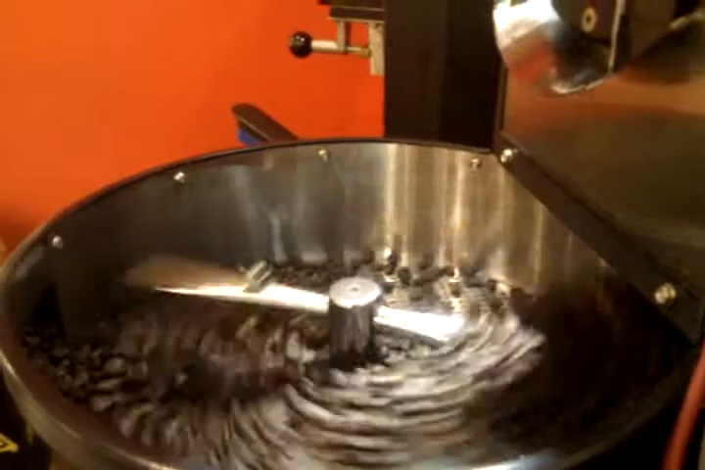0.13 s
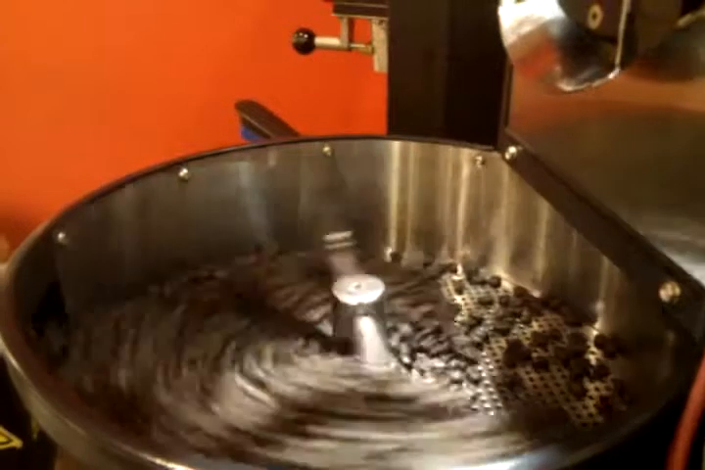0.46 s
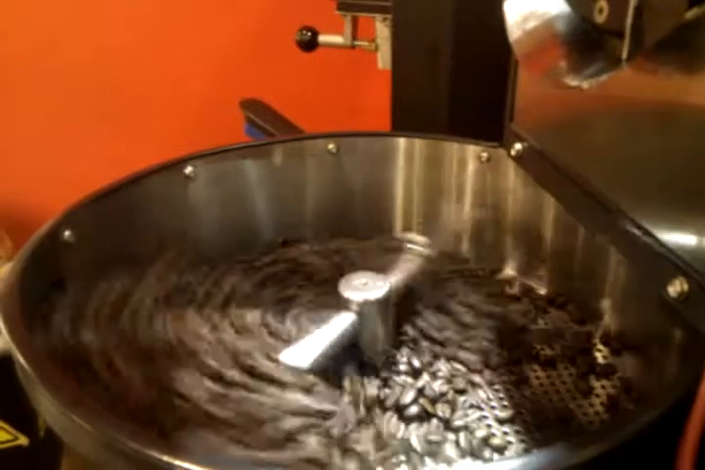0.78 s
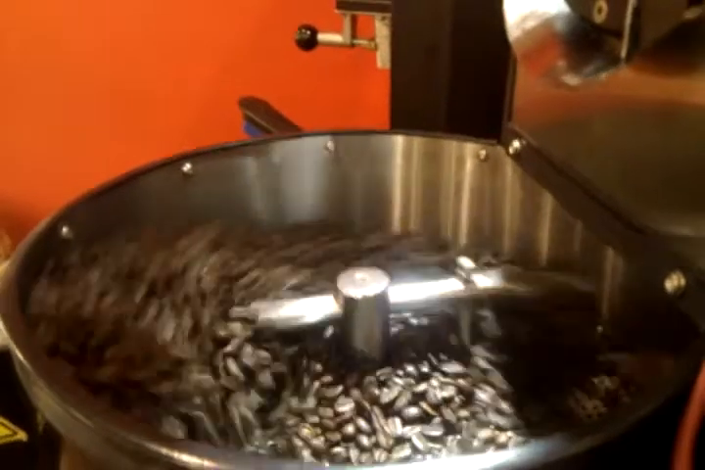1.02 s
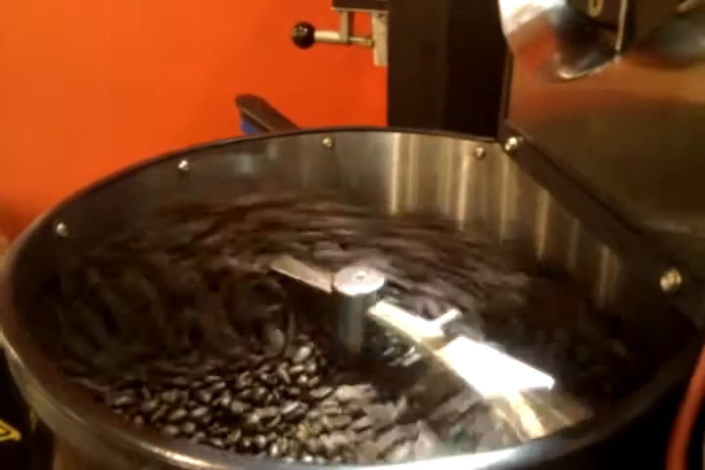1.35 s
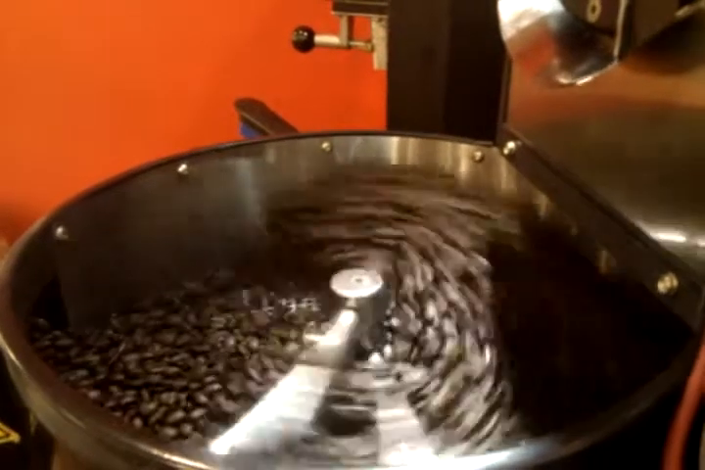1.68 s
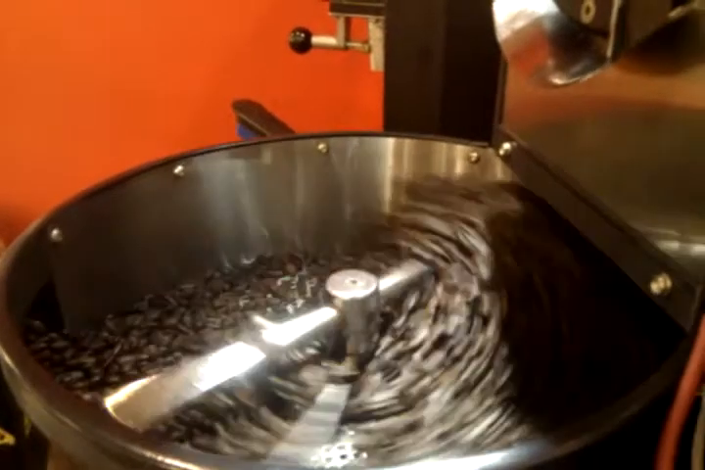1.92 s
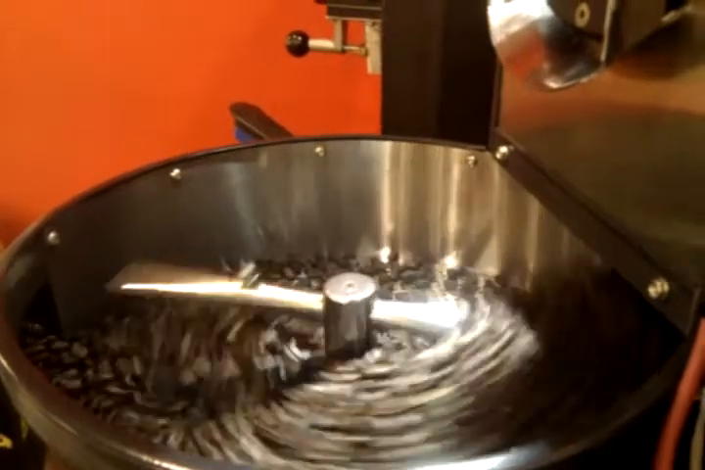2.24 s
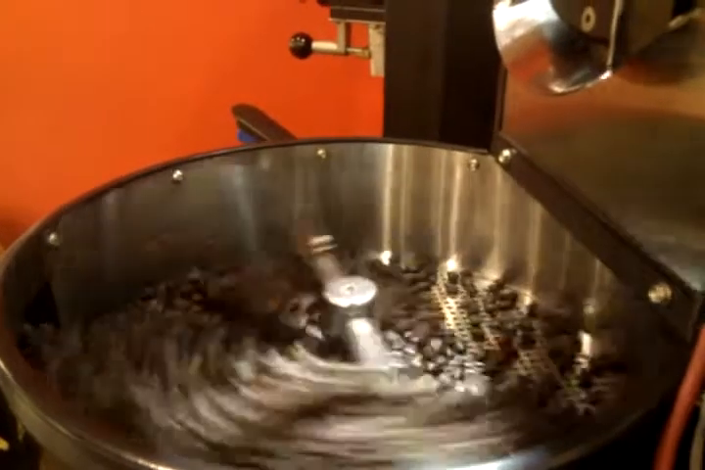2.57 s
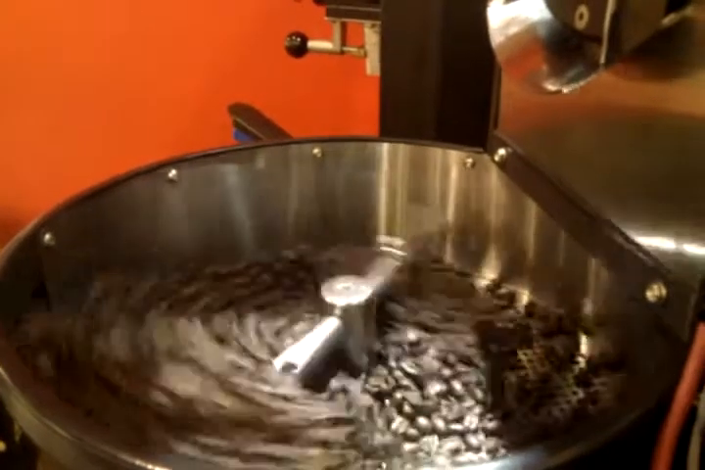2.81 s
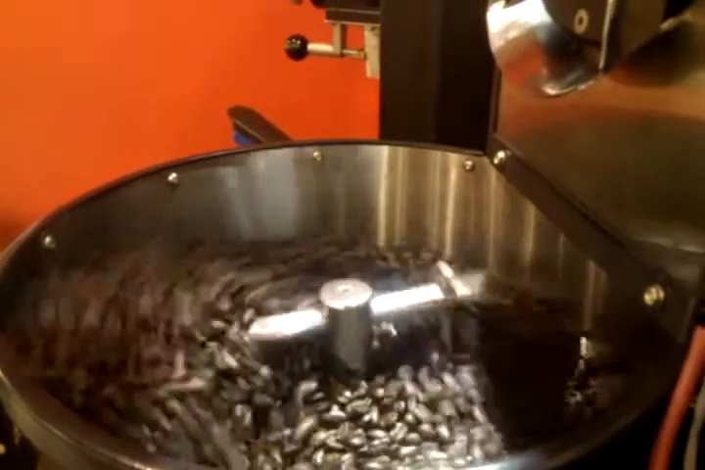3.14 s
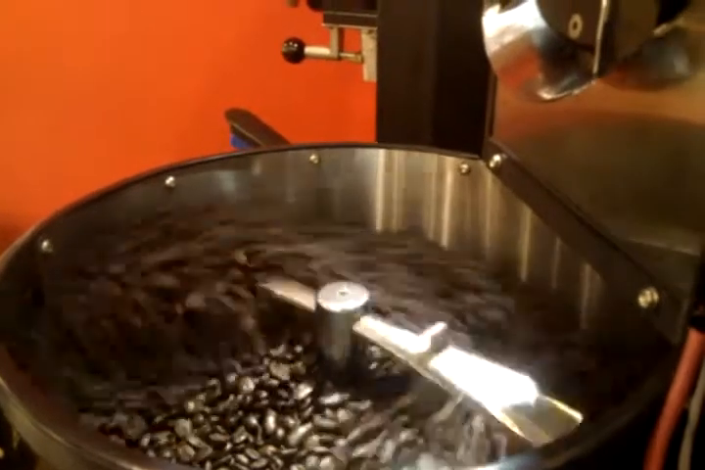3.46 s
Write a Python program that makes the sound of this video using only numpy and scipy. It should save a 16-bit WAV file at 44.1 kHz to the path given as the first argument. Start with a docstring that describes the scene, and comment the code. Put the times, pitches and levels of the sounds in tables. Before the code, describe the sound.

Coffee beans rattle and swish as steel arms stir them, over a rushing fan.

```python
"""Steel arms stir roasted coffee beans round the cooling tray of a roaster, close by.
From the start the beans tick on each other and slide in a swish, while the cooling fan rushes and
whines, its motor hums and the housing rumbles. Soon clumps clack on the perforated steel and the arms
shove the heap into crunches. At 0.28 s all but the clacks duck and swell back, the first of six dips.
The hardest clack comes at 2.35 s; near 2.6 s the fan, hum and rumble swell to their loudest."""
import sys
import numpy as np
from scipy.fft import rfft, irfft, next_fast_len
from scipy.io import wavfile
from scipy.ndimage import map_coordinates

SR = 44100
rng = np.random.default_rng(int(sys.argv[2]) if len(sys.argv) > 2 else 0)


def wav_record(signal):
    """Record a signal, one row per channel, as 16-bit PCM in the file named by sys.argv[1]."""
    frames = np.transpose(np.atleast_2d(signal))
    bounded = np.clip(frames, -1, 1)
    # unit amplitude maps onto the largest positive 16-bit level
    quanta = np.round(bounded * 32767).astype(np.int16)
    wavfile.write(sys.argv[1], SR, quanta)


N = 157878

# spectrum of bean impacts: frequency_hz, gain_db
IMPACT_SPECTRUM = [(1500, -48), (3500, -32.5), (4700, -19), (5350, -9), (5650, -11), (5950, -6),
                   (6300, -5.5), (6950, 1.5), (7300, -4), (8000, -2.5)]


def amp(db):
    """The decibel scale: 20 dB is a factor of ten in amplitude."""
    return 10 ** (np.asarray(db) / 20)


def unit(x):
    """Normalisation to an rms of 1."""
    return x / np.sqrt(np.mean(x ** 2) + 1e-20)


def curve(rows):
    """Linear interpolation of (time_s, value) rows, one value a sample."""
    return np.interp(np.arange(N) / SR, *np.transpose(rows))


def wobble(knots_per_s):
    """Smooth random modulation: a spline through Gaussian knots."""
    knots = rng.standard_normal(int(N * knots_per_s / SR) + 4)
    return map_coordinates(knots, [np.arange(N) * knots_per_s / SR])


def coloured(x, spectrum):
    """Minimum-phase filtering by (frequency_hz, gain_db) rows."""
    size = 2 * next_fast_len(N // 2 + 8192)
    hz, db = np.transpose(spectrum)
    gain = amp(np.interp(np.log(np.fft.rfftfreq(size, 1 / SR) + 1), np.log(hz + 1), db))
    cepstrum = irfft(np.log(gain))
    cepstrum[1:size // 2] *= 2  # folding the cepstrum makes the filter causal
    cepstrum[size // 2 + 1:] = 0
    return irfft(rfft(x, size) * np.exp(rfft(cepstrum)))[:N]


def contacts(per_s, scatter_db):
    """A random point process: times and amplitudes of independent bean contacts."""
    count = int(per_s * N / SR)
    return rng.random(count) * N / SR, amp(scatter_db * np.minimum(rng.standard_normal(count), 2))


def overlap(start_s, rings):
    """Superposition: each ring adds in from its own start time."""
    at = (start_s * SR).astype(int)[:, None] + np.arange(rings.shape[1])
    return np.bincount(at.ravel(), rings.ravel(), N)[:N]


def grains(start_s, sizes, lo_hz, hi_hz, t60_s):
    """Damped free vibration: each contact rings briefly at a random pitch."""
    t = np.arange(256) / SR
    place, phase = rng.random((len(start_s), 2)).T
    pitch_hz = lo_hz + (hi_hz - lo_hz) * place
    rings = np.sin(2 * np.pi * (pitch_hz[:, None] * t + phase[:, None]))
    rings *= sizes[:, None] * np.exp(-np.log(1000) * t / t60_s)
    return overlap(start_s, rings)


def bean_rattle():
    """Granular impact noise: beans tick on each other in small avalanches."""
    # clatter of tumbling beans: time_s, relative_level_db
    levels = [(0.0, -13), (0.08, -19), (0.24, -12.5), (0.4, -16.5), (0.88, -12), (0.95, -13), (1.03, -11.5),
              (1.35, -13), (1.51, -16.5), (2.07, -11.5), (2.23, -18.8), (2.31, -17.0), (2.63, -14.5),
              (2.7, -14), (2.86, -15.5), (2.94, -12.5), (3.42, -13.5), (3.58, -12)]
    ticks = grains(*contacts(per_s=3600, scatter_db=0), lo_hz=4100, hi_hz=8495, t60_s=0.0036)
    avalanches = amp(0.93 * wobble(50) + 0.85 * wobble(240))
    return amp(curve(levels) - 2.0) * unit(coloured(ticks * avalanches, IMPACT_SPECTRUM))


def bean_swish():
    """Sliding friction: dense, duller contacts merge into a swish, and each shove adds its power."""
    # beans sliding ahead of the arms: time_s, relative_level_db
    levels = [(0.0, -25.5), (0.08, -27), (0.16, -25.5), (0.56, -27.5), (0.64, -25), (1.35, -24),
              (1.59, -26), (1.67, -27), (1.83, -26.0), (1.99, -26.5), (2.31, -28.5), (2.47, -25.5),
              (2.63, -27.0), (2.7, -23.5), (2.86, -27), (3.02, -25), (3.18, -24.5), (3.58, -23)]
    # spectrum of the friction: frequency_hz, gain_db
    spectrum = [(500, -32.5), (1500, -17), (2300, -7), (2750, -8), (3200, -5), (3900, -2.5), (5200, 1),
                (6500, 3.5), (8000, -2)]
    friction = grains(*contacts(per_s=9000, scatter_db=1.5), lo_hz=1000, hi_hz=7920, t60_s=0.0035)
    sliding = amp(curve(levels) + 3.0 + .6 * wobble(40))
    return np.hypot(sliding, arm_shoves()) * unit(coloured(friction, spectrum))


def arm_shoves(attack_s=0.005, release_s=0.0044):
    """Envelope of forced sliding: the crunch rises fast, holds while an arm pushes and dies away."""
    # pushes on the heap: start_s, length_s, level_db
    shoves = [(0.14, .016, -21), (0.442, .025, -30.5), (0.745, 0.03, -20.5), (0.858, .018, -22),
              (1.522, 0.016, -24), (1.631, .08, -22.5), (1.737, 0.025, -20), (1.982, 0.015, -24.5),
              (2.347, .015, -22.5), (2.682, .022, -24), (3.002, 0.02, -22), (3.469, 0.021, -21.5)]
    t = np.arange(N) / SR
    envelope = np.zeros(N)
    for start_s, length_s, level_db in shoves:
        rise = np.clip((t - start_s) / attack_s, 0, 1)
        release = np.exp(-np.maximum(t - start_s - length_s, 0) / release_s)
        envelope += amp(level_db) * rise * release
    return envelope


def steel_clacks(ring_hz=6930, rise_s=.0014, followers=8):
    """Impact excites resonance: one bean sets the steel ringing, and the rest of its clump follows."""
    # clumps striking the steel: start_s, relative_level_db, spread_s
    clumps = [(.0727, -8.5, .008), (0.106, -12.5, 0.0051), (0.154, -12.5, 0.0054), (0.185, -9.5, .016),
              (.236, -12.5, .018), (.346, -16, 0.011), (0.447, -13.5, .01), (0.502, -13, .012),
              (0.745, -8, .012), (0.816, -7.5, .006), (0.956, -10, .005), (1.0061, -10, .005),
              (1.0375, -9.5, .008), (1.08, -7, .006), (1.098, -8.5, .004), (1.5224, -10, .014),
              (1.75, -6.5, .008), (1.985, -9, 0.015), (2.347, -4, .012), (2.43, -11.5, .006),
              (2.656, -9.5, .004), (2.696, -9, .005), (2.77, -10.5, .006), (2.9392, -10.5, .012),
              (2.9692, -11, .008), (3.0131, -9, 0.0036), (3.498, -7.5, .012)]
    start_s, level_db, spread_s = np.transpose(clumps)
    t = np.arange(SR // 50) / SR
    envelope = (t / rise_s) ** 2 * np.exp(2 * (1 - t / rise_s))
    chance = rng.random((len(clumps), followers + 1))
    pitch_hz = ring_hz * (1 + 0.041 * (chance[:, :1] - .5))
    rings = amp(level_db[:, None] - 2) * envelope * np.sin(2 * np.pi * pitch_hz * t)
    follow_s = start_s[:, None] + spread_s[:, None] * chance[:, 1:]
    sizes = np.repeat(amp(level_db - 4.5), followers)
    tails = grains(follow_s.ravel(), sizes, lo_hz=5800, hi_hz=7200, t60_s=0.0062)
    return overlap(start_s, rings) + coloured(tails, IMPACT_SPECTRUM)


def tones(base_hz, lines, drift_hz, flutter_db):
    """A line spectrum: (order, level_db) multiples of one drifting frequency, each fluttering."""
    cycles = np.cumsum(base_hz + drift_hz * wobble(2.96)) / SR
    total = np.zeros(N)
    for order, level_db in lines:
        gain = amp(level_db + flutter_db * wobble(9))
        total += gain * np.sin(2 * np.pi * (order * cycles + rng.random()))
    return np.sqrt(2) * total


def cooling_fan(shaft_hz=49.765, faint_db=-57):
    """Aerodynamic noise: air rushes through the tray and the rotor whines at orders of its shaft rate."""
    # rush of the air: time_s, relative_level_db
    levels = [(0.0, -31), (0.32, -29), (0.56, -31), (1.11, -31.5), (1.35, -34.5), (1.43, -33.5),
              (1.67, -30.5), (2.15, -31), (2.23, -32), (2.63, -29.0), (2.86, -32), (3.58, -32)]
    # spectrum of the rush: frequency_hz, gain_db
    spectrum = [(20, -16.5), (48, -10), (100, -7.5), (160, -2), (230, -1.5), (330, -1.5), (385, 3),
                (440, -5), (720, -3.5), (1150, -7), (1550, -10.5), (2400, -6.5), (4000, -21)]
    # strong lines of the whine: shaft_order, level_db
    strong_lines = [(3, -50), (8, -43.5), (11, -48), (14.5, -48.5), (16, -52.5), (17, -51), (20, -49),
                    (22, -49.5), (23, -48.5), (24, -44), (26, -51.5)]
    air = unit(coloured(rng.standard_normal(N), spectrum)) * amp(-1.5 + 0.45 * wobble(12))
    strong_orders = [order for order, _ in strong_lines]
    faint_lines = [(order, faint_db) for order in range(10, 30) if order not in strong_orders]
    whine = tones(shaft_hz, strong_lines + faint_lines, drift_hz=.03, flutter_db=1.34)
    flow_db = curve(levels)
    return amp(flow_db) * air + amp(flow_db - flow_db.mean()) * whine


def motor_hum(mains_hz=50.02, flutter_db=.8):
    """Forced vibration at harmonics of the mains; the strongest, the fourth, swells and fades."""
    # fourth harmonic: time_s, level_db
    levels = [(0, -36), (.2, -33.5), (.4, -32), (.72, -35), (1.03, -34), (1.2, -41), (1.36, -41),
              (1.62, -39.5), (1.88, -36.5), (2.15, -36.5), (2.48, -34.5), (2.63, -29.5), (2.8, -35.5),
              (3.12, -35.5), (3.38, -42), (3.58, -34.5)]
    # weaker harmonics: mains_order, level_db
    weak_lines = [(2, -48), (5, -51.5), (6, -43), (14, -47)]
    fourth = amp(curve(levels)) * tones(mains_hz, [(4, 0)], drift_hz=0.049, flutter_db=flutter_db)
    return fourth + tones(mains_hz, weak_lines, drift_hz=.02, flutter_db=flutter_db)


def housing_rumble():
    """Structure-borne sound: the shaking housing radiates low noise, now more, now less."""
    # strength of the shaking: time_s, level_db
    levels = [(0, -43), (.56, -39), (.75, -39.5), (1.0, -43), (1.5, -43.5), (1.8, -43), (2.15, -44),
              (2.6, -37.5), (2.9, -41), (3.58, -44)]
    # spectrum of the housing: frequency_hz, gain_db
    spectrum = [(15, -17.5), (35, -16), (50, -4), (68, -2.5), (86, -8.5), (108, -3), (135, 3), (175, -3),
                (260, -17.5), (600, -45)]
    return amp(curve(levels)) * unit(coloured(rng.standard_normal(N), spectrum))


def level_dips(drop_s=.003):
    """Amplitude modulation: a gain that drops within milliseconds and creeps back."""
    # brief dips in level: start_s, depth_db, recovery_s
    dips = [(0.276, 8.5, 0.31), (1.262, 2.5, 0.36), (1.539, 3, 0.23), (2.043, 5.5, 0.3), (2.702, 5.5, 0.18),
            (3.524, 4.5, 0.33)]
    t = np.arange(N) / SR
    loss_db = np.zeros(N)
    for start_s, depth_db, recovery_s in dips:
        onset = np.clip((t - start_s) / drop_s, 0, 1)
        remaining = np.clip(1 - (t - start_s) / recovery_s, 0, 1) ** 1.8
        loss_db += depth_db * onset * remaining
    return amp(-loss_db)


def scene():
    """Superposition of beans and machine; all but the clacks dip together."""
    stirring = bean_rattle() + bean_swish() + cooling_fan() + motor_hum() + housing_rumble()
    return (stirring * level_dips() + steel_clacks())[None]


def record(dry):
    """Band limiting: the treble falls steeply above 7 kHz and is cut off at the top of the band."""
    # treble roll-off: frequency_hz, gain_db
    roll_off = [(7100, -1), (7400, -5.5), (7700, -19), (7900, -31.5), (8000, -49.5), (8200, -30),
                (8550, -22.5), (8900, -23), (9100, -31.5)]
    top_hz = 9150
    spectrum = rfft(coloured(dry[0], roll_off), 2 * N)
    passband = np.fft.rfftfreq(2 * N, 1 / SR) < top_hz
    return irfft(spectrum * passband)[None, :N]


dry = scene()
out = record(dry)
wav_record(out)
```